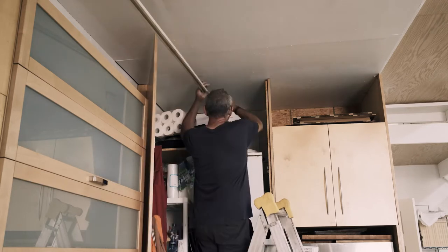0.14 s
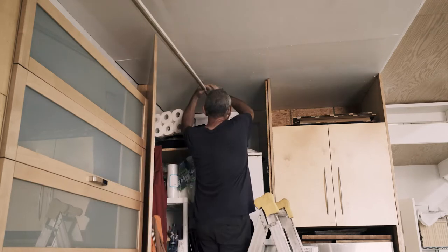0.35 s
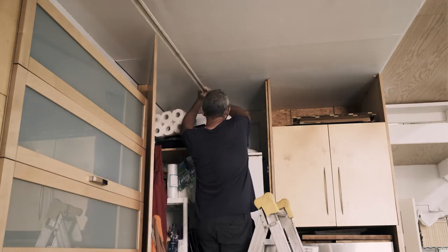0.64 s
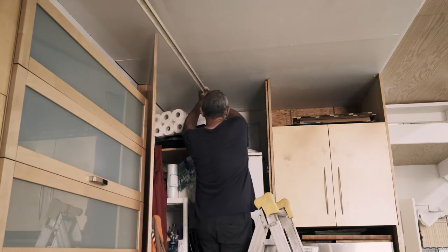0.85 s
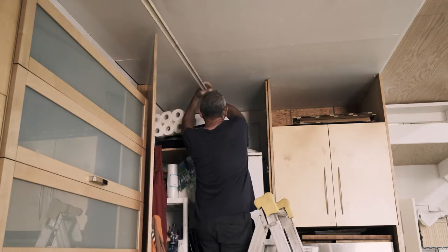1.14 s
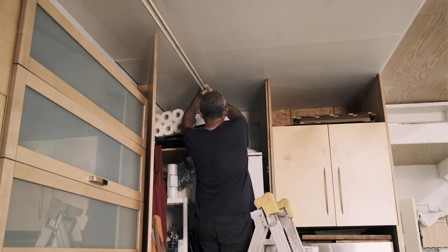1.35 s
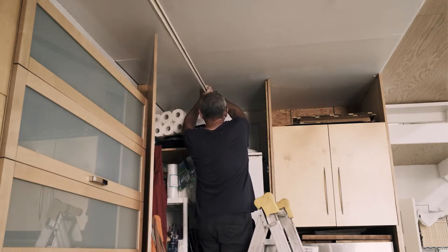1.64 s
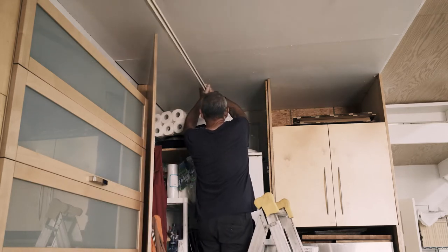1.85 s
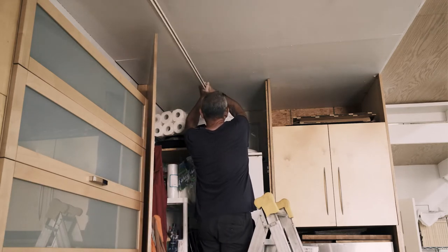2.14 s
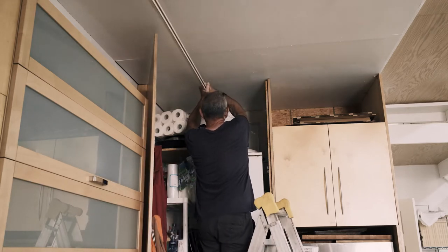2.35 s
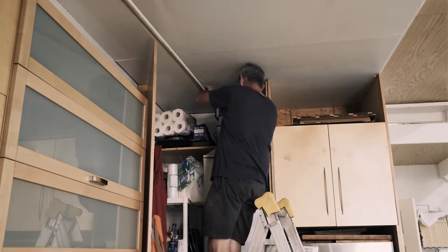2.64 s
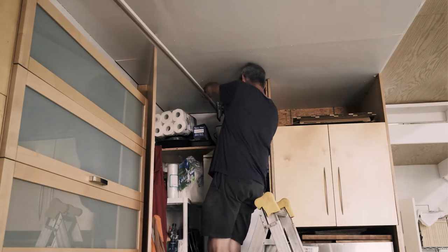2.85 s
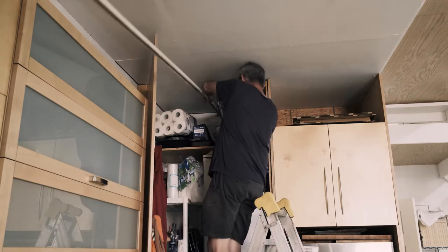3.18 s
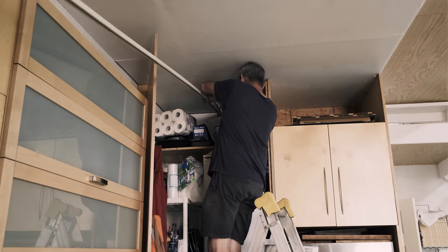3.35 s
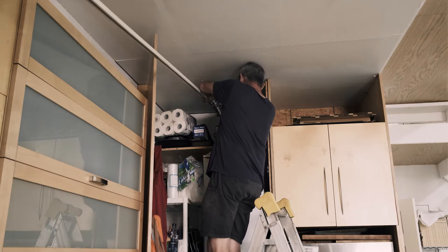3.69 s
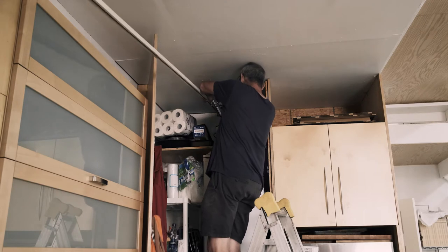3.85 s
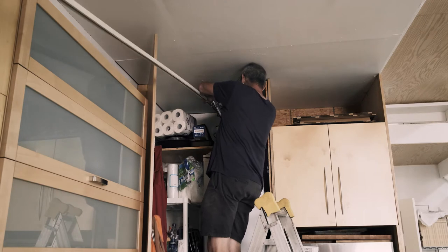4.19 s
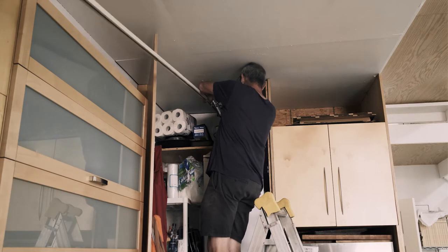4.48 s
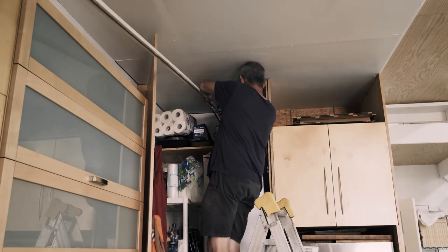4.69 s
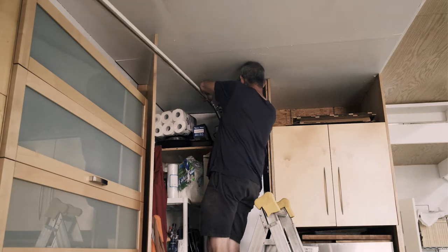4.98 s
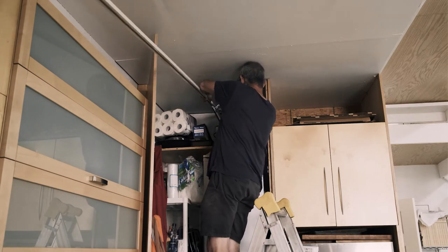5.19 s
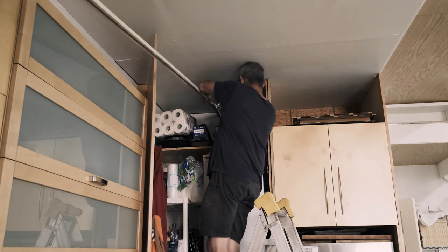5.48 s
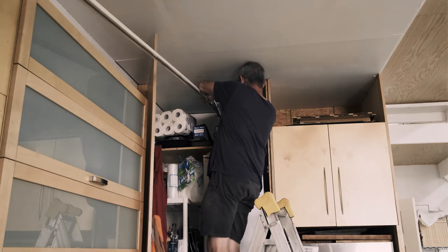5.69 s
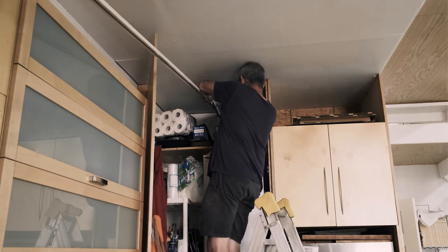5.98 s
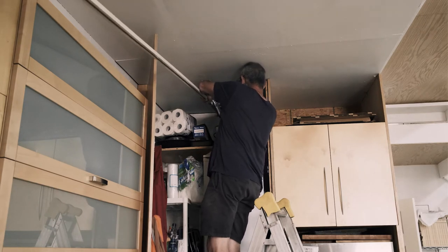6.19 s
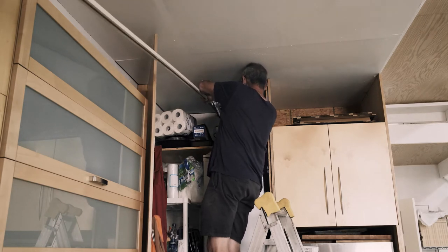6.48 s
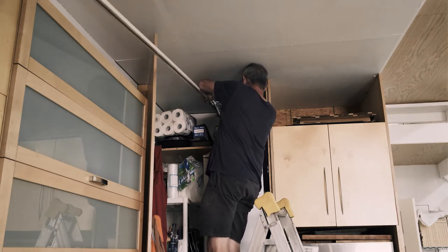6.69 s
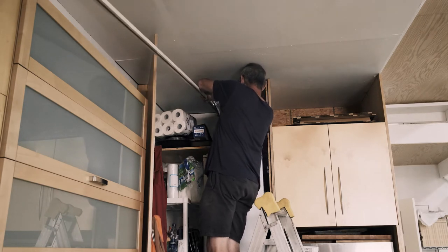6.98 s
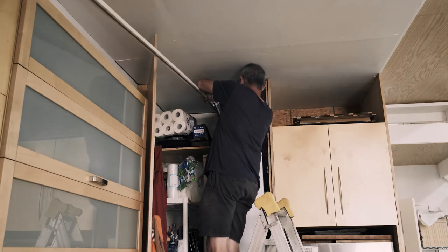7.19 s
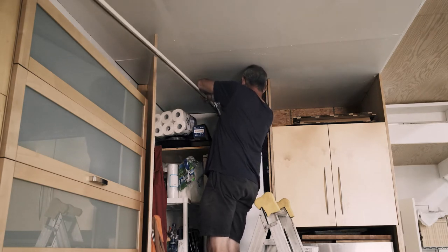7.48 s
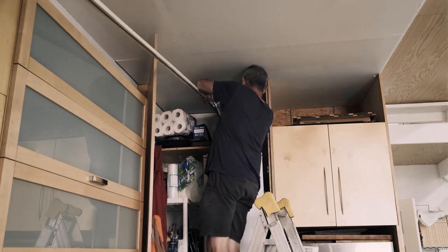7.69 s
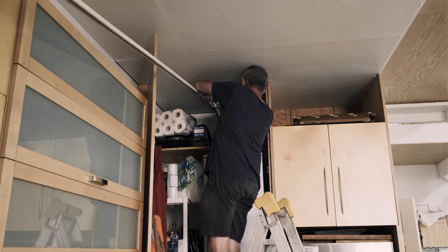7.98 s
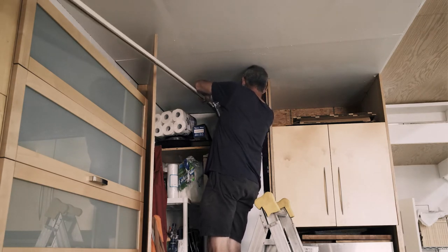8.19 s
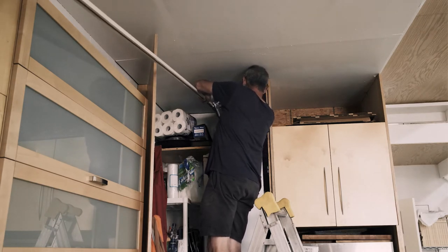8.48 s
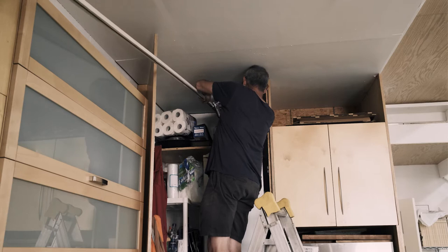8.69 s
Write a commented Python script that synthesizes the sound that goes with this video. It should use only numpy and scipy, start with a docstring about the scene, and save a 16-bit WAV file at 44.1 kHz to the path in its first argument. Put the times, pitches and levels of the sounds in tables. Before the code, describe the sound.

A small, fairly live kitchen, heard close and centred over very faint still air. From 0 to 1.3 s there are soft rubs and dull bumps, with one hard knock at 0.45 s. Between 1.35 and 2.2 s a dense run of heavy clunks and metallic clacks comes with rumbling, rustling shuffles. It thins out: a knock at 2.7 s, light taps and clicks from 3.5 to 4 s, another click at 4.4 s, then a sharp triple-crack snap at 5.0 s. At about 5.3 s a reciprocating saw surges to full volume within a tenth of a second, a harsh rasping buzz at about 38 strokes a second, with metallic drone, blade ring and high hiss. Cupboards jolt faintly. Around 6.9, 7.1 and 7.6 s the blade snags with short squeals and dips. From 7.7 s the loosened rail shakes in a lower, rougher rattle; the stroke slows slightly and the shaking stops near 8.77 s, the saw still loud at the end.

```python
"""Faint rubs and dull bumps over still air come first, as a metal rail and a saw are handled in a
small kitchen; knocks and clicks follow. Then a reciprocating saw cuts the rail at about 38 strokes
a second, jolting the cupboards; late in the cut the loosened rail shakes with each stroke.
Contacts are enveloped noise exciting resonances; the saw sums tooth noise, stroke harmonics,
the ringing of rail and blade, squeals and fan hiss."""
import sys
import numpy as np
from scipy import signal
from scipy.fft import rfft, irfft
from scipy.io import wavfile

SR = 44100
rng = np.random.default_rng(int(sys.argv[2]) if len(sys.argv) > 2 else 0)


def wav_record(signal):
    """Record a signal, one row per channel, as 16-bit PCM in the file named by sys.argv[1]."""
    frames = np.transpose(np.atleast_2d(signal))
    bounded = np.clip(frames, -1, 1)
    # unit amplitude maps onto the largest positive 16-bit level
    quanta = np.round(bounded * 32767).astype(np.int16)
    wavfile.write(sys.argv[1], SR, quanta)


N = 389844

# Spectra below are shapes: [f/Hz, density level/dB per Hz]; their overall level is set separately.
# still air: spectrum
AIR_SPECTRUM = [(24, -46), (40, -7), (231, 2), (402, -4.5), (733, -3), (3380, -11), (14100, -20),
                (16000, -19)]
AIR_DB = -62.5
# reverberation of the kitchen: [f/Hz, t60/s]
ROOM_T60 = [(150, 0.37), (400, 0.36), (1000, 0.43), (2800, 0.35), (7300, 0.4), (14000, 0.11)]
ROOM_DB = -3.5  # energy of the reflections against the direct sound
EDGES_HZ = 35 * 2 ** (np.arange(28) / 3)  # third-octave edges

# cupboards: spectrum
CUPBOARD_SPECTRUM = [(50, -36), (100, -8.5), (150, -3.5), (260, 7), (400, 3), (800, -38)]
# the saw jolts the cupboards: [t/s, level/dB]
JOLTS = [(5.42, -42), (5.6, -47), (5.8, -53), (5.97, -38), (6.12, -48), (6.27, -43), (6.35, -41),
         (6.52, -42.5), (6.72, -49), (6.86, -48), (6.97, -36), (7.11, -34), (7.2, -42), (7.32, -41),
         (7.42, -40), (7.5, -33.5), (7.66, -33.5)]
JOLT_RISE_DB_PER_S, JOLT_FALL_DB_PER_S = 300, 248
CUPBOARD_LOOSE_DB = -35  # steady rattle with the rail wholly loose

# low rumble of handling: spectrum
RUMBLE_SPECTRUM = [(24, -68.5), (40, -31.5), (181, 1), (425, -8.5), (633, -9), (783, -16), (1200, -16.5),
                   (1560, -39), (2640, -120)]
# grainy rustle of handling: spectrum
RUSTLE_SPECTRUM = [(240, -35.5), (400, -15.5), (814, -18.5), (921, 3), (2150, 2), (2550, 1), (2970, 6.5),
                   (8630, -10.5), (16000, -66)]
# bouts of rubbing and shuffling, and rattle that trails after knocks:
# [t/s, hold/s, rumble level/dB, rustle level/dB]
BOUTS = [(0.45, 0.13, -44, -48), (0.786, 0.12, -39, -83), (0.994, 0.16, -53, -61),
         (1.378, 0.13, -31, -32.5), (1.661, 0.27, -26.5, -31.5), (1.966, 0.28, -26, -35),
         (2.684, .04, -45, -68), (2.737, .05, -44, -35), (2.853, 0.27, -50.5, -55),
         (3.479, 0.1, -42.5, -64), (3.626, 0.04, -36.5, -47), (3.694, .04, -47, -53),
         (3.772, 0.045, -34.5, -40), (3.917, 0.055, -44, -51), (4.164, 0.034, -53.5, -72),
         (4.439, .45, -69, -75), (5.025, 0.063, -77, -37)]
BOUT_RISE_DB_PER_S, BOUT_SAG_DB_PER_S, BOUT_FALL_DB_PER_S = 599.5, 14.5, 146
# rubs, flicks and rattles, faint ringing lines after a knock, and a long faint hiss:
# [t/s, length/s, f/Hz, width/Hz, level/dB]
NOISE_BURSTS = [(0.36, 0.26, 1700, 6200, -49.5), (2.395, 0.031, 1100, 2400, -45.5),
                (2.395, 0.027, 3200, 2200, -49), (2.8, 0.071, 1690, 1400, -48),
                (0.976, 0.06, 1450, 900, -42), (2.8, .22, 1190, 120, -59), (2.8, .2, 1500, 120, -59),
                (2.72, 0.016, 7700, 9200, -42), (3.6, 0.051, 1900, 1500, -47), (2.9, 0.77, 8400, 900, -75),
                (0.02, 0.056, 6000, 9200, -57), (2.21, .09, 1200, 430, -40), (1.625, .04, 1200, 700, -36),
                (2.7, .17, 1120, 180, -59), (4.84, 0.068, 1170, 430, -45.5), (3.75, .03, 6600, 1200, -31),
                (3.07, 0.054, 2400, 3000, -62), (3.45, 0.083, 2700, 1230, -53.5),
                (4.13, 0.069, 1500, 1200, -56.5), (4.17, 0.072, 2900, 1400, -53)]

# dull bumps on wood and ladder: [t/s, level/dB, centre f/Hz, t60/s]
BUMPS = [(0.032, -42.5, 320, 0.16), (0.469, -24, 266, 0.069), (0.622, -37.5, 570, 0.11),
         (0.753, -32.5, 330, 0.34), (0.799, -36, 636, 0.2), (0.979, -24.5, 617, 0.091),
         (1.266, -44.5, 337, 0.39), (1.328, -34.5, 1140, 0.4), (1.627, -23, 646, 0.11),
         (1.627, -23, 267, 0.15), (1.962, -9.5, 530, 0.14), (2.025, -13.5, 526, 0.16),
         (2.109, -16, 534, 0.13), (2.215, -26.5, 610, 0.19), (2.565, -45, 747, 0.6),
         (2.612, -37, 1440, 0.32), (2.684, -35, 199, 0.36), (2.76, -21.5, 213, 0.092),
         (3.074, -39.5, 477, 0.12), (3.08, -30, 185, 0.19), (3.47, -32, 198, 0.71),
         (3.769, -23.5, 264, 0.15), (3.911, -28.5, 254, 0.16), (4.141, -47, 213, 0.47),
         (4.16, -34.5, 430, .15), (4.195, -27.5, 191, 0.17), (4.348, -50.5, 783, 0.59),
         (4.57, -44, 795, 0.11), (4.798, -39.5, 238, 0.3), (5.248, -39, 886, 0.26)]
# the saw's housing rings on after a click: [t/s, level/dB, centre f/Hz, t60/s]
HOUSING = [(4.411, -36, 1990, 0.33), (5.026, -27.5, 1980, 0.59)]
BUMP_WIDTH, HOUSING_WIDTH = .65, 0.35  # resonance width as a share of the centre

# knocks: [t/s, level/dB, weight below about 1 kHz/dB, brightness at the top/dB, contact t60/s]
KNOCKS = [(0.0765, -49, 14, -4, 0.076), (0.4444, -6.5, -10.5, -15.5, 0.077), (0.4524, -11, -8, -6, 0.054),
          (0.6135, -26.5, -33, -14, 0.07), (0.795, -36.5, -1, -13, 0.2), (0.855, -23.5, 2, -17.5, 0.11),
          (1.358, -9.5, 1.5, -12, 0.096), (1.4098, -17, 6.5, -17.5, 0.27), (1.4529, -5.5, 6, -16, 0.051),
          (1.493, -4.5, 4, -11.5, 0.063), (1.665, 1, 6.5, -14, 0.05), (1.837, 2, 7, -14.5, 0.052),
          (1.955, -2.5, -16, 0, 0.076), (2.0168, -12.5, -20, -2, 0.12), (2.1013, -10, -6.5, -5, 0.11),
          (2.7374, -16, -7.5, -9.5, 0.097), (3.5502, -28, 12.5, -43, 0.086),
          (3.6226, -11.5, -11, -33, 0.11), (3.75, -20.5, -25, -26, 0.27), (3.7914, -12, -20, -25, 0.11),
          (3.8233, -13.5, -22, -56, 0.075), (3.9898, -27, 1.5, -35, 0.079), (4.402, -21, 0, -6, 0.13),
          (4.707, -46.5, 7.5, -26.5, 0.11), (4.8436, -40.5, 12, -37.5, 0.092), (5.02, -6, -10, -22, 0.057)]
# colour of a knock: [f/Hz, level/dB per Hz, share of the weight, share of the brightness]
KNOCK_COLOUR = [(60, -31, 0.98, 0.3), (200, -11, 1, 0.1), (650, 2.5, 0.81, 0.059), (900, -1.5, 0.57, 0),
                (1280, 0.5, .6, 0), (2800, 1.1, 0, 0), (7000, 2, 0, 0.39), (13000, 0, 0.23, 0.92),
                (16000, -9.5, 0, 1)]
KNOCK_RISE_S, KNOCK_LEAD_S = 0.0095, .005  # rise time of the burst, and its start ahead of the marked time
RATTLE_DB, RATTLE_HZ = 2, 150  # unevenness of a contact
# modes of the rail when knocked: [f/Hz, level/dB, t60/s]
RAIL_MODES = [(642, -7.5, 0.11), (1600, -7, .05), (1880, 0.5, 0.18), (2556, 5, 0.034), (3480, -3, 0.013),
              (3770, -3, 0.025), (5200, -27, 0.09)]
RAIL_RING_DB = -5

# the saw's catch snaps home in three cracks: [t/s, peak level/dB]
CRACKS = [(5.0141, -4), (5.0175, -4), (5.022, -12)]
CRACK_T60_S = 0.019
# resonances of the catch: [f/Hz, width/Hz, level/dB]
CATCH_MODES = [(550, 130, -7), (1850, 590, 6.5), (3240, 1000, 3), (4400, 670, -2), (8300, 2400, -24)]

# overall gain of the saw: [t/s, level/dB]
SAW_LEVEL = [(5.2, -88), (5.27, -57), (5.31, -22.5), (5.39, -12), (5.52, -12.5), (5.58, -13.5),
             (5.73, -18.5), (5.79, -12.5), (6.18, -12.5), (7.02, -13), (7.09, -12.5), (7.22, -15),
             (7.36, -12), (7.76, -12.5), (8.08, -10.5), (8.18, -13), (8.84, -11)]
# stroke rate: [t/s, strokes per s]
STROKES = [(5.3, 38.4), (5.65, 38.1), (5.74, 38.3), (5.81, 37.1), (6.05, 38.1), (6.46, 38.4), (7.58, 38.5),
           (7.69, 38.8), (7.91, 37.6), (8.62, 36.3), (8.72, 35.8), (8.84, 35.7)]
# how far the rail has come loose: [t/s, share 0-1]
LOOSENING = [(5.2, 0.07), (6.84, 0.17), (6.9, 0.56), (7.0, 0.66), (7.3, 0.16), (7.6, 0.21), (7.68, 0.76),
             (7.85, 0.91), (8.84, 0.98)]
PARTED_S = 8.77  # the rail comes apart and stops shaking
# tooth noise on the firm rail: spectrum
TEETH_FIRM = [(150, -76.5), (250, -26.5), (400, -16.5), (700, -5.5), (1300, -8.5), (2000, -4), (3200, -7),
              (4500, -12.5), (6500, -15.5), (8800, -11.5), (10300, -26), (13800, -23), (16000, -35)]
# tooth noise on the loose rail: spectrum
TEETH_LOOSE = [(150, -35), (300, -17.5), (500, -8.5), (900, -8), (1300, -10), (1950, -5.5), (3400, -4),
               (5000, -5.5), (7000, -10), (8800, -10.5), (10300, -19), (14000, -23.5), (16000, -34.5)]
TOOTH_LOW_HZ = 1090  # the repeated tooth noise is kept above this; stroke harmonics carry the low pitches
# harmonics of the stroke on the firm rail: [multiple of the stroke rate, level/dB]
STROKE_FIRM = [(4, -32), (6, -33), (8, -25), (10, -25), (11, -24), (12, -3), (13, -9), (14, -18), (15, -10),
               (16, -4), (17, -20), (18, -18), (19, -14), (20, -2), (21, -3), (22, 0), (23, -7), (24, -10),
               (25, -12), (26, -11), (27, -11)]
# harmonics of the stroke on the loose rail: [multiple of the stroke rate, level/dB]
STROKE_LOOSE = [(1, -43), (2, -14), (3, -15), (4, -5.5), (5, 3), (6, 3), (7, 1), (8, 1.5), (9, -6), (10, 1),
                (11, -5.5), (12, -4), (13, -5), (14, 0), (15, -4), (16, -8), (17, -6), (19, -6), (23, -6),
                (24, -2), (25, -4)]
# resonances of the rail under the saw: [f/Hz, width/Hz, level/dB]
DRONE_MODES = [(496, 98, -7.5), (632, 18, -2.5), (845, 124, -1.5)]
# resonances of the blade in a shallow cut: [f/Hz, width/Hz, level/dB]
BLADE_SHALLOW = [(1700, 100, -1), (1854, 240, 10), (2380, 110, -20), (2460, 90, -12), (3170, 230, -4.5)]
# resonances of the blade in a deep cut: [f/Hz, width/Hz, level/dB]
BLADE_DEEP = [(1944, 310, 1), (2126, 76, 2.5), (2490, 95, -11.5), (3370, 680, -3)]
# base levels against the saw; the drone grows once the teeth have a groove
DRONE_DB, BLADE_DB, NO_GROOVE_DB, GROOVE_S, GROOVE_RISE_S = -7, -4, -5.5, 5.7, 0.45
BLADE_FREED_DB = -4.5  # the freed rail damps the blade's ring
# the blade jams: [t/s, length/s, drone level change/dB, blade level change/dB]
JAMS = [(6.23, 0.084, -3, 1), (6.87, .18, -5.5, -21), (7.127, 0.13, -0.5, -4.5), (7.443, 0.15, -2.5, -2.5),
        (7.605, 0.24, -10, -11)]
# the blade snags and squeals: [t/s, length/s, f/Hz, width/Hz, level against the saw/dB]
SQUEALS = [(6.882, 0.14, 2620, 200, -8), (6.89, 0.074, 3960, 350, -7), (6.92, 0.042, 6500, 600, -10),
           (7.146, 0.032, 11000, 4000, -14.5), (7.623, 0.05, 2470, 300, -7.5), (7.65, 0.13, 6960, 400, -9),
           (7.79, 0.038, 5100, 350, -9)]
# hiss of the motor's fan: [t/s, centre f/Hz, level against the saw/dB]
FAN = [(5.25, 8400, -20), (5.91, 7780, -15.5), (7.51, 8140, -19.5), (7.88, 7820, -20), (8.84, 7900, -25)]
FAN_WIDTH_HZ = 580

MIC_LOW_HZ, CUTOFF_HZ = 70, 15780
KNEE, HEADROOM = .65, .22  # amplitude where rounding begins, and the most it lets through above


def from_db(db):
    """Definition of level: decibels to amplitude gain."""
    return 10 ** (np.asarray(db) / 20)


def rms_one(x):
    """Normalisation: scale to rms 1."""
    return x / np.sqrt(np.mean(x ** 2) + 1e-20)


def in_time(rows):
    """Linear interpolation: each column of a table as a curve, one value a sample."""
    s, *columns = np.transpose(rows)
    return [np.interp(np.arange(N) / SR, s, c) for c in columns]


def at_hz(points, hz):
    """Interpolation of a spectrum on a log-frequency axis."""
    table = np.array(points)
    return np.interp(np.log(hz), np.log(table[:, 0]), table[:, 1])


def drift(rate_hz):
    """Low-pass random process: two equal poles leave slow chance with spread 1."""
    step = 40  # samples between drawn values
    r = np.exp(-2 * np.pi * rate_hz * step / SR)
    white = rng.standard_normal(N // step + 2002)
    slow = signal.lfilter([1], [1, -2 * r, r * r], white)[2000:]
    return np.interp(np.arange(N) / step, np.arange(len(slow)), rms_one(slow))


def coloured(x, spectrum):
    """Spectral shaping: weight a white signal by frequency; rms 1."""
    hz = np.maximum(np.fft.rfftfreq(len(x), 1 / SR), 1)
    return rms_one(irfft(rfft(x) * from_db(at_hz(spectrum, hz)), len(x)))


def resonance(x, hz, width_hz):
    """Damped oscillator: a two-pole resonance with gain 1 on top."""
    r = np.exp(-np.pi * width_hz / SR)
    zeros = np.array([1, 0, -1]) * (1 - r * r) / 2
    return signal.lfilter(zeros, [1, -2 * r * np.cos(2 * np.pi * hz / SR), r * r], x)


def rung(x, modes):
    """Modal superposition: resonances side by side, each applied twice for steep flanks; rms 1."""
    return rms_one(sum(from_db(db) * resonance(resonance(x, hz, w), hz, w) for hz, w, db in modes))


def contact(size, rise_s, t60):
    """Impact envelope: a rounded rise under an exponential decay, t60 held to 0.01-0.6 s."""
    t = np.arange(size) / SR
    rise = np.sin(np.pi / 2 * np.minimum(t / rise_s, 1)) ** 2
    return rise * from_db(-60 * t / np.clip(t60, .01, .6))


def swell(s, rise, fall, hold=0, sag=0):
    """Exponential envelope: climbs to 1 at s, sags through the hold and falls; slopes in dB/s."""
    t = np.arange(N) / SR - s
    return from_db(rise * np.minimum(t, 0) - sag * np.clip(t, 0, hold) - fall * np.maximum(t - hold, 0))


def swells(events):
    """Narrow-band noise: bursts in one resonance each that swell and fade."""
    out = np.zeros(N)
    for s, length, hz, width_hz, db in events:
        at, size = round(s * SR), round(length * SR)
        shape = np.sqrt(np.sin(np.pi * np.arange(size) / size))
        out[at:at + size] += from_db(db) * shape * rung(rng.standard_normal(size), [(hz, width_hz, 0)])
    return out


def still_air():
    """Stationary background noise: white noise with a fixed spectrum."""
    return from_db(AIR_DB) * coloured(rng.standard_normal(N), AIR_SPECTRUM)


def bands(white):
    """Band analysis: third octaves with their centres; neighbours use two unrelated noises."""
    for k, (low, high) in enumerate(zip(EDGES_HZ, EDGES_HZ[1:])):
        band_pass = signal.butter(2, [low, high], "band", fs=SR, output="sos")
        yield np.sqrt(low * high), signal.sosfilt(band_pass, white[k % 2])


def kitchen(x):
    """Reverberation: dense reflections that decay exponentially, band by band."""
    t = np.arange(int(.8 * SR)) / SR
    white = rng.standard_normal((2, len(t)))
    tail = sum(band * from_db(-60 * t / at_hz(ROOM_T60, hz)) for hz, band in bands(white))
    onset = np.clip(t / 0.0024, 0, 1)
    tail = tail * onset / np.sqrt(np.sum(tail ** 2))
    return x + from_db(ROOM_DB) * signal.fftconvolve(x, tail)[:N]


def cupboards(loose):
    """Driven panels: noise in single jolts, then a lumpy steady rattle once the rail is loose."""
    jolts = sum(from_db(db) * swell(s, JOLT_RISE_DB_PER_S, JOLT_FALL_DB_PER_S) for s, db in JOLTS)
    steady = from_db(CUPBOARD_LOOSE_DB + 2.5 * drift(12)) * loose ** 6
    return coloured(rng.standard_normal(N), CUPBOARD_SPECTRUM) * (jolts + steady)


def handling():
    """Amplitude-modulated noise: lumpy rumble and grainy rustle in bouts, and narrow-band bursts."""
    low, high = np.zeros(N), np.zeros(N)
    for s, hold, rumble_db, rustle_db in BOUTS:
        bout = swell(s, BOUT_RISE_DB_PER_S, BOUT_FALL_DB_PER_S, hold, BOUT_SAG_DB_PER_S)
        low += from_db(rumble_db) * bout
        high += from_db(rustle_db) * bout
    rumble = coloured(rng.standard_normal(N), RUMBLE_SPECTRUM) * low * from_db(2.4 * drift(17))
    rustle = coloured(rng.standard_normal(N), RUSTLE_SPECTRUM) * high * from_db(1.5 * drift(40))
    return rumble + rustle + swells(NOISE_BURSTS)


def bumps(events, share):
    """Soft impact: noise that dies, heard through one broad body resonance applied twice."""
    out, size = np.zeros(N + SR), int(.5 * SR)
    for s, db, centre_hz, t60 in events:
        width_hz = share * centre_hz
        push = rng.standard_normal(size) * contact(size, 0.0092, t60)
        body = resonance(resonance(push, centre_hz, width_hz), centre_hz, width_hz)
        at = round(s * SR)
        # a narrow resonance passes less noise power; the root makes up for it
        out[at:at + size] += from_db(db) * body * np.sqrt(SR / (width_hz * 4))
    return out[:N]


def knocks():
    """Impact excitation: each short coloured noise burst also sets the rail's modes ringing."""
    out, size = np.zeros(N + SR), int(.3 * SR)
    hz = np.maximum(np.fft.rfftfreq(size, 1 / SR), 1)
    rattle = from_db(RATTLE_DB * drift(RATTLE_HZ))
    for s, level_db, weight_db, bright_db, t60 in KNOCKS:
        colour = [(f, db + low * weight_db + high * bright_db) for f, db, low, high in KNOCK_COLOUR]
        at = round((s - KNOCK_LEAD_S) * SR)
        white = rng.standard_normal(size)
        envelope = contact(size, KNOCK_RISE_S, t60) * rattle[at:at + size]
        burst = irfft(rfft(white) * from_db(at_hz(colour, hz)), size) * envelope
        chances_db = rng.normal(0, 4, len(RAIL_MODES))  # each knock favours other modes
        for (mode_hz, mode_db, mode_t60), chance_db in zip(RAIL_MODES, chances_db):
            width_hz = np.log(1000) / np.pi / mode_t60
            ring = resonance(white * envelope, mode_hz, width_hz)
            burst += from_db(RAIL_RING_DB + mode_db + chance_db) * ring
        out[at:at + size] += from_db(level_db) * burst
    return out[:N]


def catch():
    """Hard impact: short cracks heard through the resonances of the catch."""
    out, size = np.zeros(N), int(.05 * SR)
    for s, peak_db in CRACKS:
        push = rng.standard_normal(size) * contact(size, .001, CRACK_T60_S)
        crack = sum(from_db(db) * resonance(push, hz, width_hz) for hz, width_hz, db in CATCH_MODES)
        at = round(s * SR)
        out[at:at + size] += from_db(peak_db) * crack / np.abs(crack).max()
    return out


def fan():
    """Flow noise: hiss of cooling air, shifted to a band whose centre moves with the motor."""
    centre_hz, fan_db = in_time(FAN)
    low_pass = signal.butter(2, FAN_WIDTH_HZ / 2, fs=SR, output="sos")
    band = signal.sosfilt(low_pass, rng.standard_normal((2, N)))
    phase = 2 * np.pi * np.cumsum(centre_hz) / SR
    return from_db(fan_db) * rms_one(band[0] * np.cos(phase) + band[1] * np.sin(phase))


def stroke_tones(turns, orders, waver_db):
    """Fourier series of a periodic force: stroke harmonics, each wavering on its own; rms 1."""
    start = rng.random(len(orders))
    return rms_one(sum(from_db(db + waver_db * drift(3.3)) * np.sin(2 * np.pi * (k * turns + p))
                       for (k, db), p in zip(orders, start)))


def row_of_teeth(turns):
    """Periodic excitation: the same row of teeth passes on every stroke."""
    row = rng.standard_normal(1160)
    same = np.interp(turns % 1 * 1160, np.arange(1160), row)
    high_pass = signal.butter(4, TOOTH_LOW_HZ, "high", fs=SR, output="sos")
    return signal.sosfilt(high_pass, same)


def ringing(loose):
    """Damping: levels/dB of rail drone and blade ring against the saw, shifted by every jam."""
    t = np.arange(N) / SR
    jams = sum(np.outer(change, np.sin(np.pi * np.clip((t - s) / length, 0, 1)))
               for s, length, *change in JAMS)
    drone_db = DRONE_DB + NO_GROOVE_DB * np.clip(1 - (t - GROOVE_S) / GROOVE_RISE_S, 0, 1)
    blade_db = BLADE_DB + (BLADE_FREED_DB * loose ** 3 - 3.5 * loose)
    return drone_db + jams[0], blade_db + jams[1]


def rail_drone(turns, push, loose):
    """Forced vibration: noise-driven rail modes plus stroke harmonics, fading as it loosens."""
    tones = stroke_tones(turns, STROKE_FIRM, waver_db=3.0)
    return (1 - loose ** 3) * (from_db(-10) * rung(push, DRONE_MODES) + from_db(-3.0) * tones)


def blade_ring(same, bite, loose):
    """Modes of a bar: the free length of blade shortens as it sinks in, and its ring moves up."""
    deep = np.clip(4 * loose, 0, 1)
    shake = (0.71 * np.roll(same, 300) + rng.standard_normal(N)) * bite
    return (1 - deep) * rung(shake, BLADE_SHALLOW) + deep * rung(shake, BLADE_DEEP)


def shaking_rail(turns, loose):
    """Periodic forcing: the loose rail shakes with each stroke until it parts."""
    until_parted = swell(0, 0, 300, hold=PARTED_S)
    tones = stroke_tones(turns, STROKE_LOOSE, waver_db=1.7)
    return from_db(-11.0) * loose ** 6 * until_parted * tones


def saw():
    """Periodic and random excitation: teeth tear at the metal and ring blade and rail."""
    level_db = in_time(SAW_LEVEL)[0]
    loose = np.clip(in_time(LOOSENING)[0], 0, 1)
    drone_db, blade_db = ringing(loose)
    turns = np.cumsum(in_time(STROKES)[0]) / SR
    same = row_of_teeth(turns)
    chips = rng.standard_normal(N)  # new chips come on top of the repeated row
    bite = from_db(0.59 * np.sin(2 * np.pi * turns) + 0.99 * drift(25))
    teeth = (0.65 * same + chips) * bite
    tearing = (1 - loose) * coloured(teeth, TEETH_FIRM) + loose * coloured(teeth, TEETH_LOOSE)
    drone = from_db(drone_db) * rail_drone(turns, chips * bite, loose)
    blade = from_db(blade_db) * blade_ring(same, bite, loose)
    cutting = from_db(-3.0) * tearing + drone + blade + swells(SQUEALS)
    sawing = from_db(level_db) * (cutting + shaking_rail(turns, loose) + fan())
    started = np.arange(N) / SR > SAW_LEVEL[0][0]
    return sawing + cupboards(loose) * started


def scene():
    """Superposition: air, handling and saw, plus the impacts with the room's reverberation."""
    ringing_bodies = bumps(BUMPS, BUMP_WIDTH) + bumps(HOUSING, HOUSING_WIDTH)
    impacts = kitchen(ringing_bodies + knocks() + catch())
    mono = still_air() + handling() + impacts + saw()
    return np.array([mono, mono])


def record(dry):
    """Saturation and band limits: peaks over the knee are rounded, deep bass and the top are cut."""
    over = dry - np.clip(dry, -KNEE, KNEE)
    rounded = dry - over + HEADROOM * np.tanh(over / HEADROOM)
    high_pass = signal.butter(2, MIC_LOW_HZ, "high", fs=SR, output="sos")
    low_pass = signal.ellip(12, .5, 60, CUTOFF_HZ, fs=SR, output="sos")
    return signal.sosfilt(low_pass, signal.sosfilt(high_pass, rounded))


dry = scene()
out = record(dry)
wav_record(out)
```